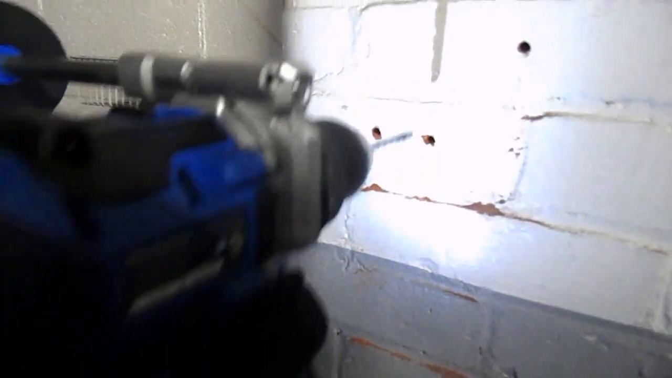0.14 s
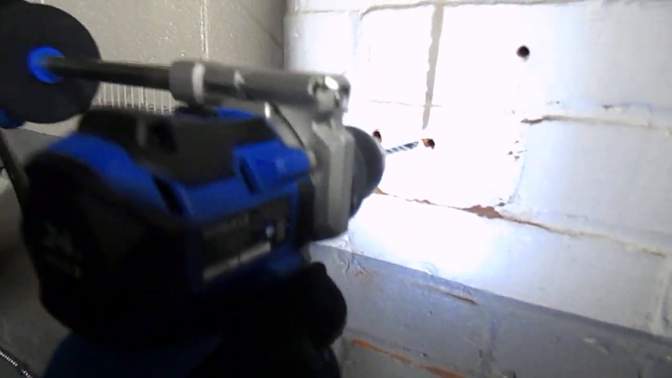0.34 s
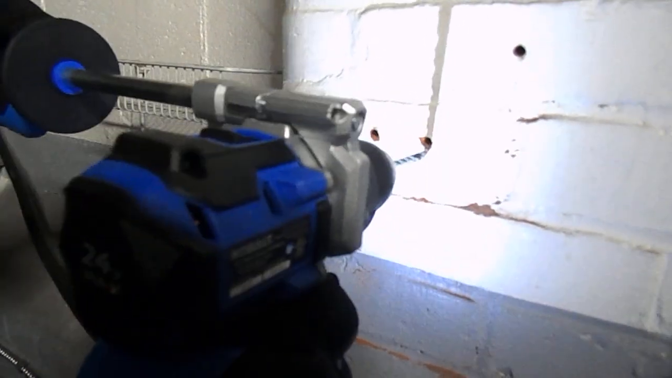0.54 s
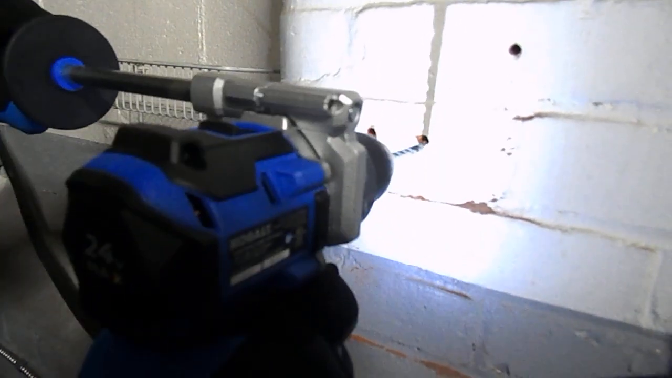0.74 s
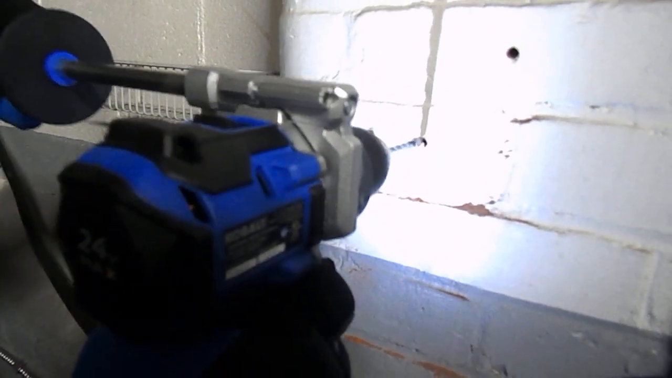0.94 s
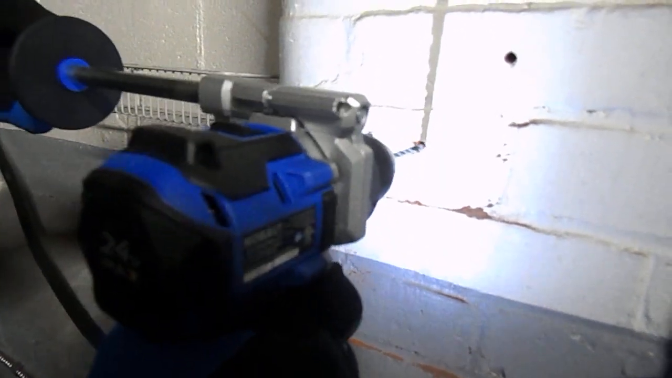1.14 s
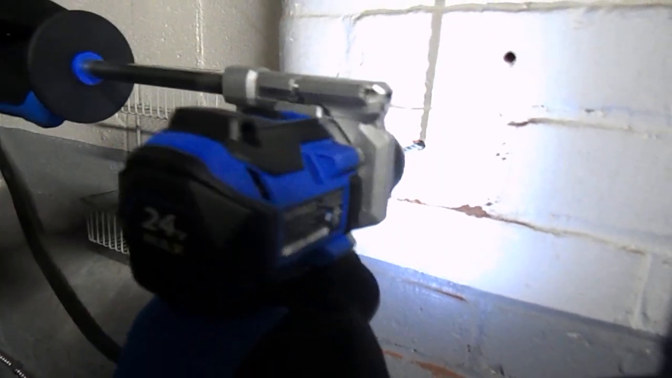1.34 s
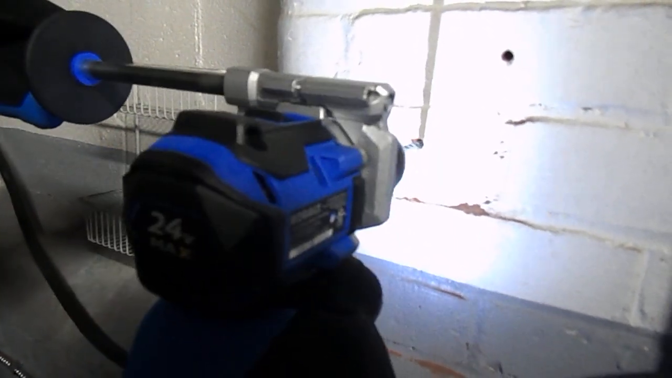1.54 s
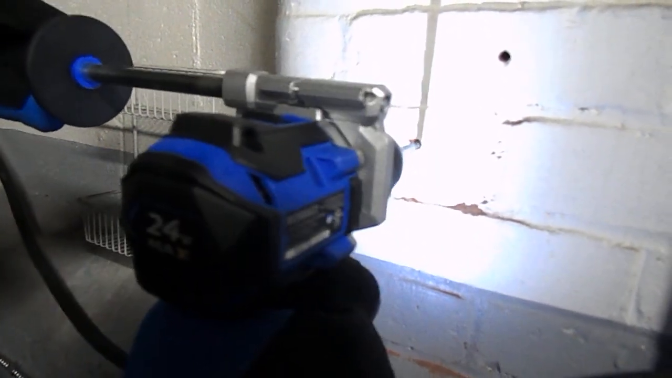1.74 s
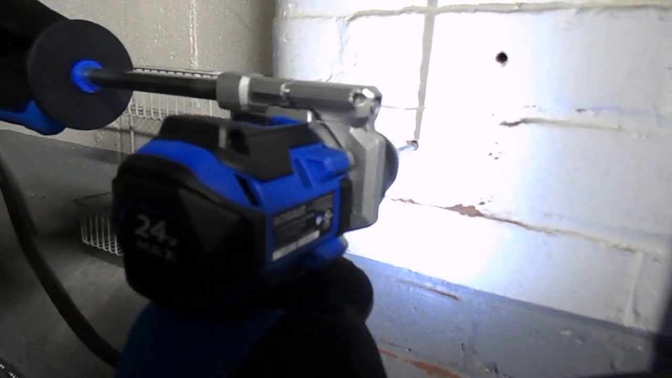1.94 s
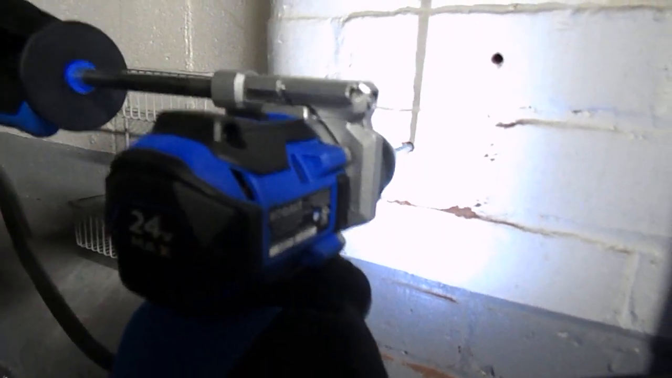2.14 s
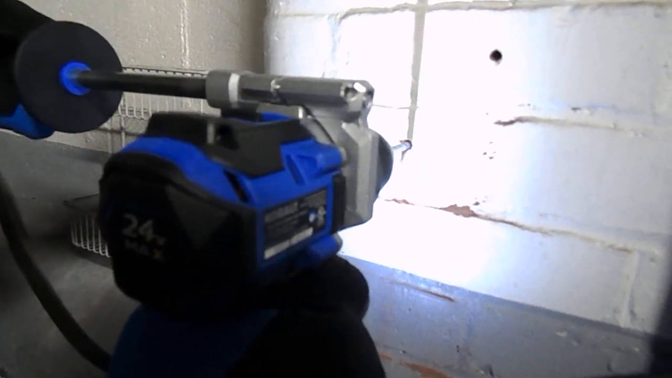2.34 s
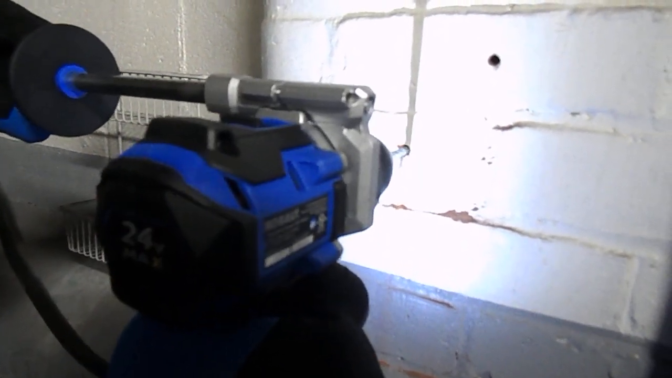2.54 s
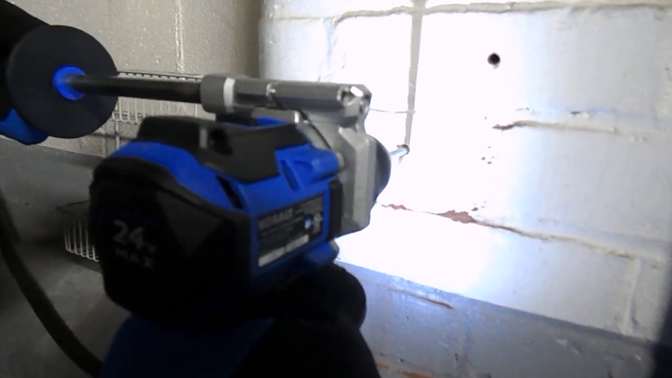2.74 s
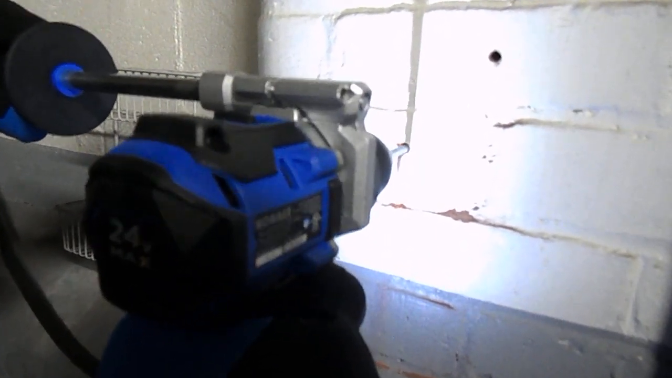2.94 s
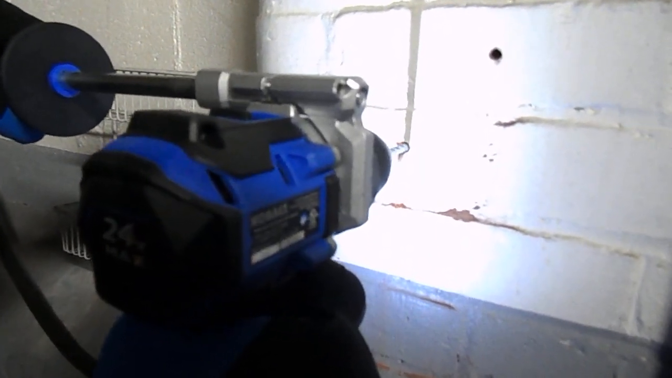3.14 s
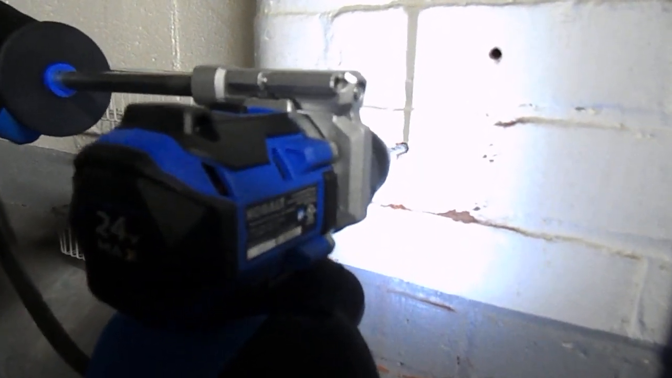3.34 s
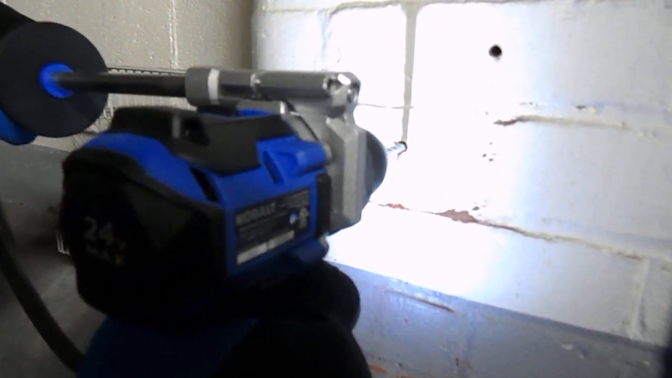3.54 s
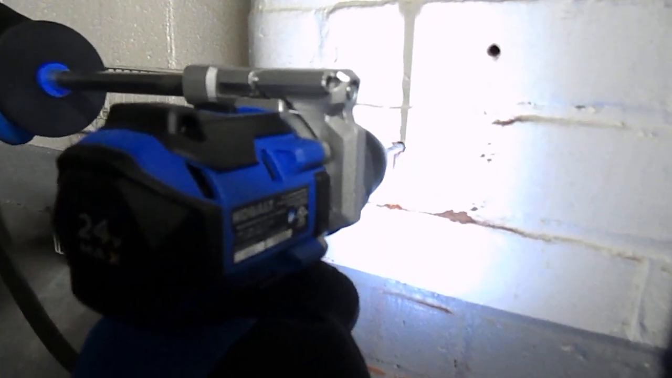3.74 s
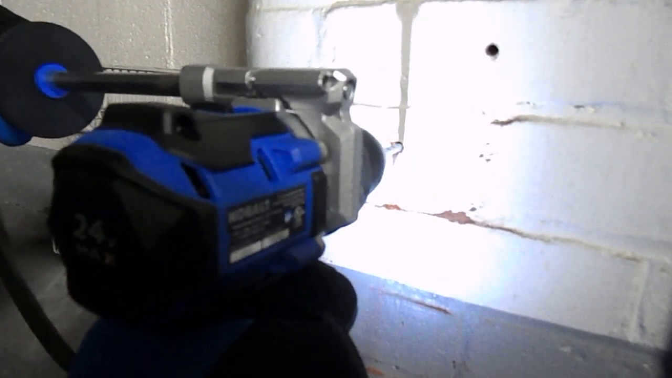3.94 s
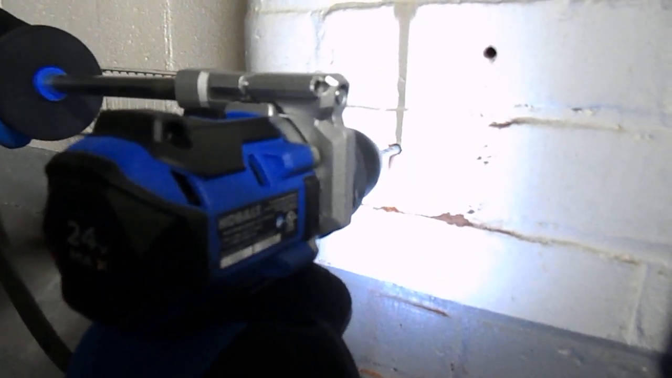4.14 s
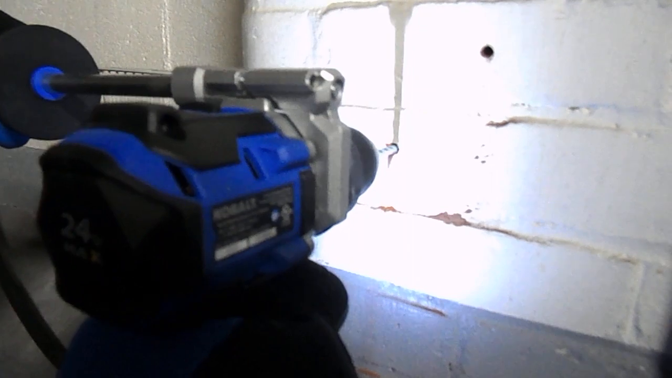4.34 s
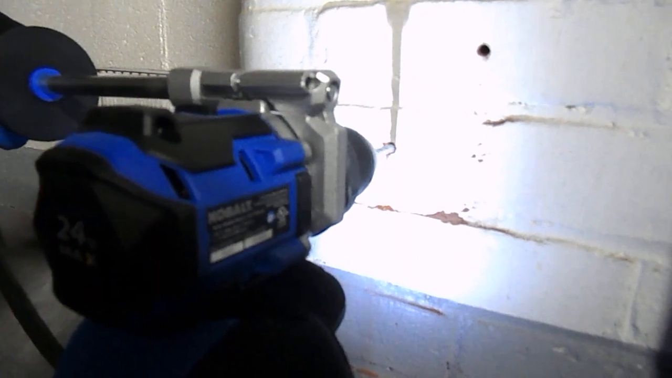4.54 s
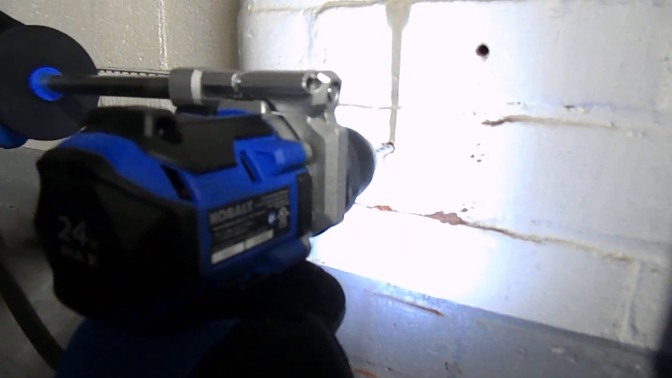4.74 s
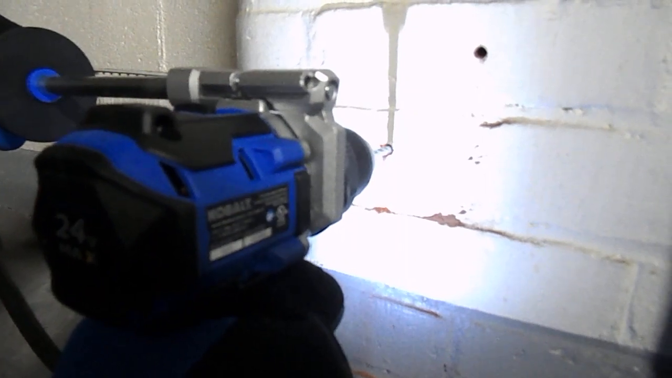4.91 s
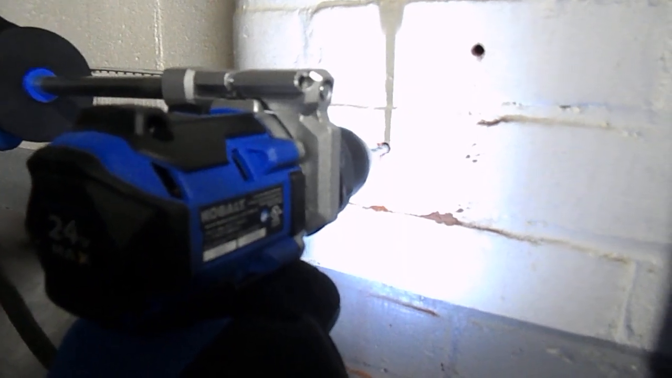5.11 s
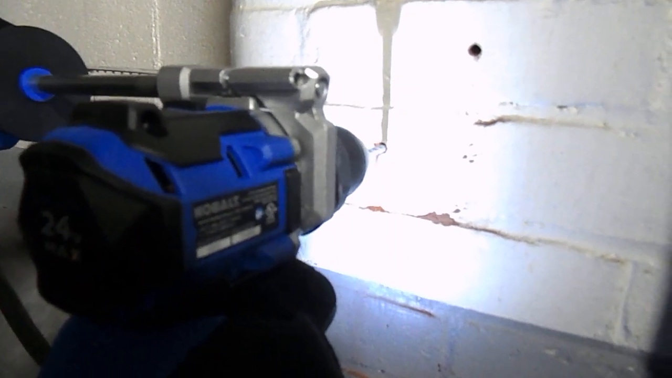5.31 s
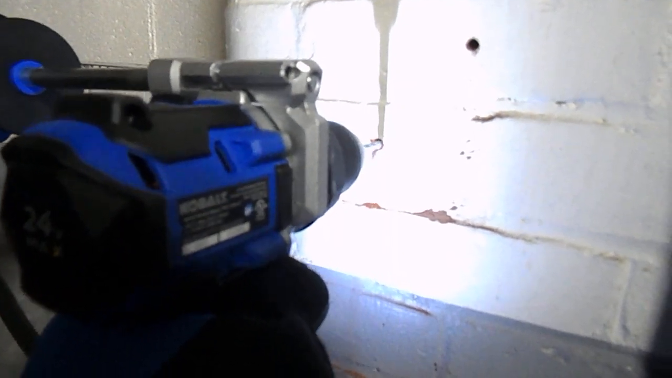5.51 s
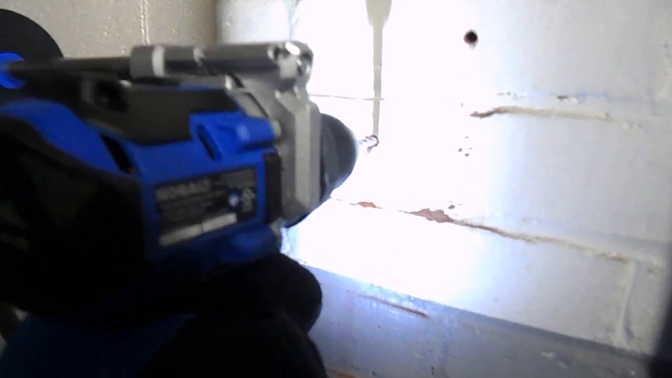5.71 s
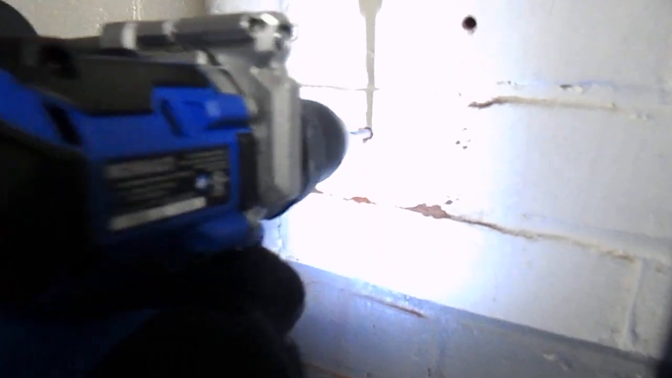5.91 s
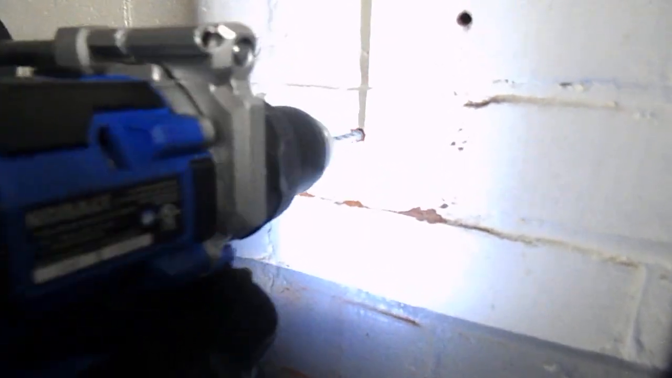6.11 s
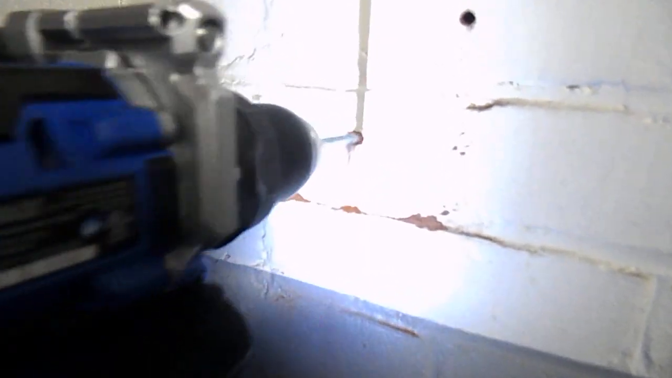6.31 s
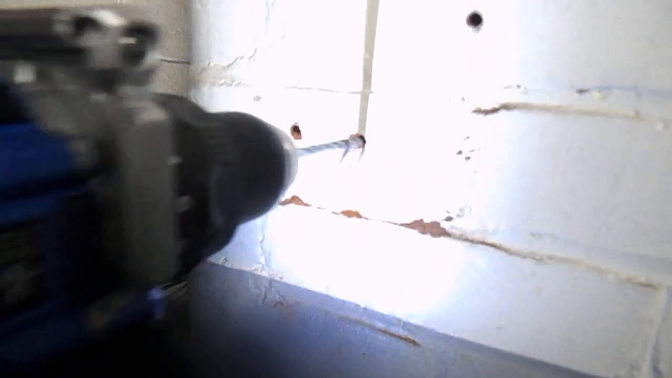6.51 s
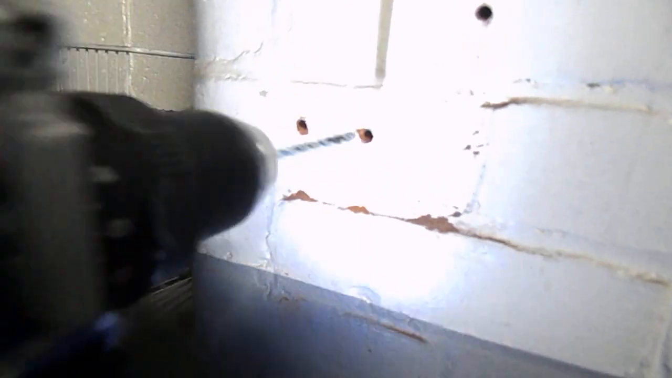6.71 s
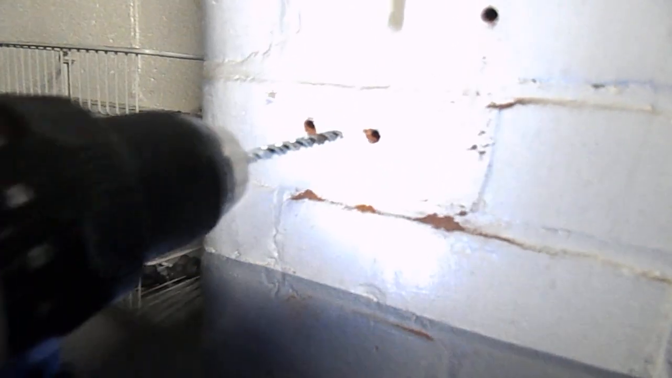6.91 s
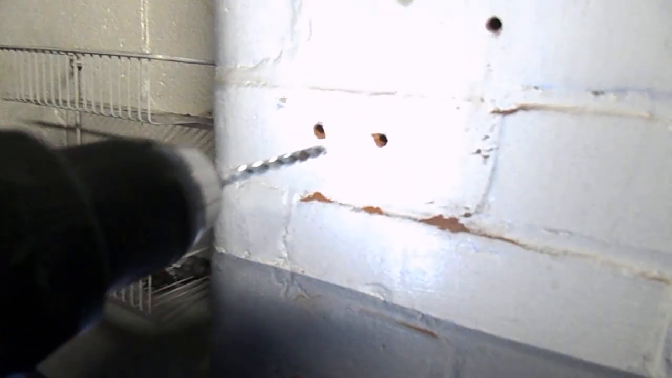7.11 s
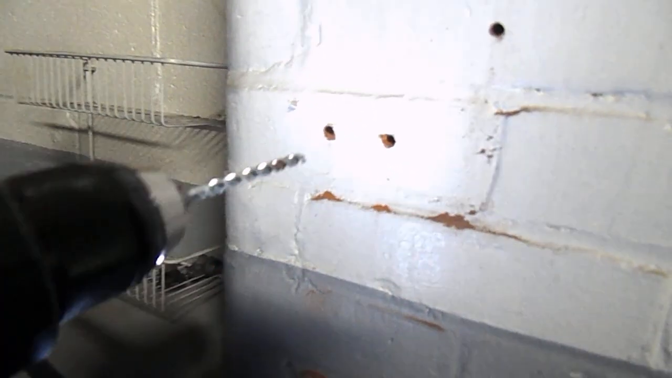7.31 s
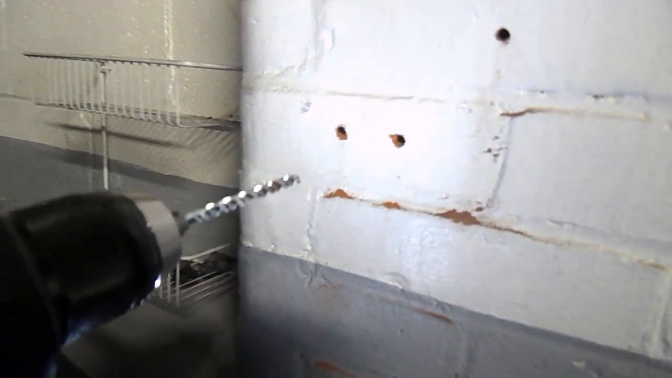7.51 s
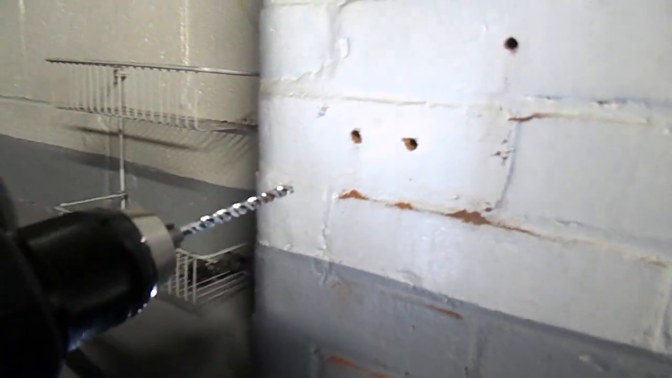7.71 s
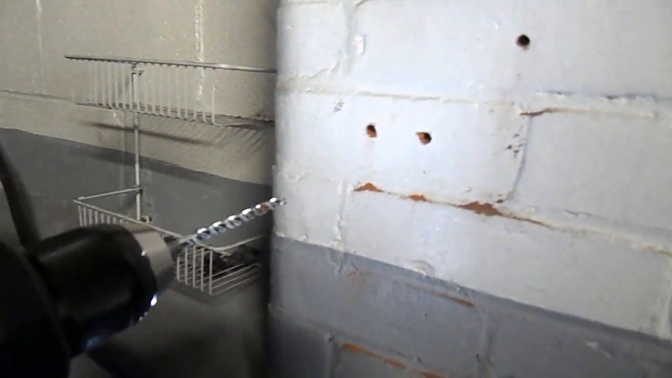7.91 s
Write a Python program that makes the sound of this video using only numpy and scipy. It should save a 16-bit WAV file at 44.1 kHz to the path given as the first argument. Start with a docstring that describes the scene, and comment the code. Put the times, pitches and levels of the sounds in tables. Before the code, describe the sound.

In a small hard-walled room, the tail of an earlier drill burst fades into quiet murmur. Small knocks and ticks set the bit on brick. The hammer drill then leaps to full speed, a steady piercing whine over dense rattle and gritty hiss, with brief squeaks. It dips once, recovers, grows airier as it is pulled back close to the microphone, then brakes sharply into quiet.

```python
"""A cordless hammer drill bores into a brick wall in a small room, an arm's length from a two-port camera microphone.
First an earlier burst dies away in the room; then the bit is set on the brick with knocks, ticks and a faint slide.
The motor jumps to full speed: pole pulses whine near a ring of the rotor, gears and ratchet rattle the housing,
the bit chatters and squeaks in the hole, and crushed grit and fan air hiss.
The speed sags once, the motor runs on as the bit is drawn back past the microphone, and the shaft brakes to a stop."""
import sys
import numpy as np
from scipy import signal
from scipy.fft import rfft, irfft
from scipy.io import wavfile
from scipy.ndimage import uniform_filter1d, map_coordinates

SR = 44100
rng = np.random.default_rng(int(sys.argv[2]) if len(sys.argv) > 2 else 0)


def digitize_waveform(pressure):
    """Quantize a signal to 16-bit integers and store it at the path in sys.argv[1].

    Rows of a 2-D input are taken as channels; values are limited to [-1, 1].
    """
    field = np.atleast_2d(pressure).T
    bounded = np.clip(field, -1, 1)
    quanta = np.round(bounded * 32767).astype(np.int16)
    wavfile.write(sys.argv[1], SR, quanta)


N = 351036
T = np.arange(N) / SR
FREQS = np.arange(N // 2 + 1) * SR / N


def undb(db):
    """Decibels to gain."""
    return 10 ** (np.asarray(db) / 20)


def unit(x):
    """Scale to rms 1."""
    return x / np.sqrt(np.mean(x ** 2))


def ramp(start_s, length_s):
    """A straight rise from 0 to 1."""
    return np.clip((T - start_s) / length_s, 0, 1)


def curves(rows):
    """Each column of a table joined by straight lines in time."""
    s, *columns = np.transpose(rows)
    return [np.interp(T, s, c) for c in columns]


def over_frequency(points):
    """Points joined on a log-frequency axis."""
    hz, value = np.transpose(points)
    return np.interp(np.log(FREQS + 1), np.log(hz), value)


def colour(x, points):
    """Give a sound the spectrum of (Hz, dB) points."""
    return irfft(rfft(x) * undb(over_frequency(points)), N)


def ring(x, hz, width_hz):
    """One resonance, gain 1 at its centre."""
    b, a = signal.iirpeak(hz, hz / width_hz, fs=SR)
    return signal.lfilter(b, a, x)


def walk(rate):
    """Random levels held 1 / rate s and smoothed twice; rms 1."""
    hold = int(SR / rate)
    steps = np.repeat(rng.standard_normal(N // hold + 1), hold)
    smooth = uniform_filter1d(uniform_filter1d(steps, hold), hold)
    return unit(smooth[:N])


def impacts(per_second, scatter_db):
    """Irregular blows of scattered size and random sign."""
    struck = rng.random(N) < per_second / SR
    sign = rng.choice([-1, 1], N)
    return struck * sign * undb(scatter_db * rng.standard_normal(N))


def strokes(rows, t60):
    """Envelopes that rise within a millisecond and die away, one for each (s, dB) row."""
    total = 0
    for s, db in rows:
        rise = np.clip((T - s) / 0.0005, 0, 1)
        total = total + rise * undb(db - 60 * np.clip(T - s, 0, 5 * t60) / t60)
    return total


# How alike the two ports of the microphone hear the sound.
# Each row: frequency in Hz, likeness from 0 to 1.
PORT_LIKENESS = [(100, 0.68), (1000, 0.99), (1900, 1), (2600, 0.66), (4000, 0.38), (6000, 0.3),
                 (8300, 0.27), (10000, 0.02), (15000, 0.2)]
PORT_LAG_MS = 0.041


def ports(direct, scattered):
    """Two ports: sound reaches the left one first, and scattered sound sets them apart in the treble."""
    likeness = np.clip(over_frequency(PORT_LIKENESS), 0, 1)
    mid = rfft(direct) * np.sqrt((1 + likeness) / 2)
    side = rfft(scattered) * np.sqrt((1 - likeness) / 2)
    delay = np.exp(-2j * np.pi * FREQS * PORT_LAG_MS / 1000)
    return irfft(np.array([mid + side, (mid - side) * delay]), N)


def stereo_noise(points):
    """Coloured noise at both ports, rms 1."""
    direct, scattered = colour(rng.standard_normal((2, N)), points)
    return unit(ports(direct, scattered))


def tone(hz, db, pan_db, lag_ms=PORT_LAG_MS):
    """A gliding sine at both ports, later at the right one; pan is left minus right."""
    phase = 2 * np.pi * np.cumsum(hz) / SR + rng.uniform(0, 2 * np.pi)
    late = 2 * np.pi * hz * lag_ms / 1000
    left = undb(db + pan_db / 2) * np.sin(phase)
    right = undb(db - pan_db / 2) * np.sin(phase - late)
    return np.sqrt(2) * np.array([left, right])


# The drill is drawn back past the microphone: its noises turn more direct, and later at the right port.
DRAW_BACK_AT_S, DRAW_BACK_S = 5.75, 1.1
NEAR_SCATTER_DB, NEAR_LAG_MS = -3.5, 0.059


def drawn_back():
    """0 while the drill is at the wall, 1 when it is beside the microphone."""
    return ramp(DRAW_BACK_AT_S, DRAW_BACK_S)


def moving_ports(direct, scattered):
    """Noise of the drill at both ports, rms 1: more direct and further left as it is drawn back."""
    near = drawn_back()
    left, right = ports(direct, scattered * undb(NEAR_SCATTER_DB * near))
    heard_at = (T - near * NEAR_LAG_MS / 1000) * SR  # in samples
    right = map_coordinates(right, [heard_at], mode="nearest")
    return unit(np.array([left, right]))


# Colour of the air in the room, with no sound of the drill.
# Each row: frequency in Hz, relative level in dB.
ROOM_AIR = [(50, -45), (100, -20.5), (180, -8), (280, -2), (520, -3), (690, -1), (850, -4.5), (1400, -6.5),
            (2400, -11.5), (4500, -14), (6000, -10), (8000, -13), (12000, -18), (15500, -23.5)]
# Murmur before and after the drilling, and hiss, as rms in dB.
MURMUR_BEFORE_DB, MURMUR_AFTER_DB, HISS_DB = -42.5, -48.5, -51
# From the braking on, everything here is this much fainter, until it swells back.
LULL_DB, LULL_UNTIL_S, SWELL_S = -3.5, 7.1, 0.21
BRAKE_AT_S = 6.866


def background():
    """Room murmur and hiss, split at 4 kHz, with a thin electrical whistle."""
    after = T > BRAKE_AT_S
    lull_db = LULL_DB * after * (1 - ramp(LULL_UNTIL_S, SWELL_S))
    murmur_db = np.where(after, MURMUR_AFTER_DB, MURMUR_BEFORE_DB)
    air = stereo_noise(ROOM_AIR)
    low, high = (unit(signal.sosfilt(signal.butter(4, 4000, kind, fs=SR, output="sos"), air))
                 for kind in ("low", "high"))
    whistle = tone(np.full(N, 11719), -68.5, 0, lag_ms=.01)
    murmur = low * undb(murmur_db + 0.32 * walk(15))
    return (murmur + high * undb(HISS_DB) + whistle) * undb(lull_db)


ROOM_T60_S = .42


def room(x, wet_db):
    """The near wall throws back a quick bright spray of echoes; the rest of the room rings longer and duller."""
    t = T[:SR // 2]
    near, far = rng.standard_normal((2, 2, len(t))) * (t > .005)
    far = signal.lfilter(*signal.butter(1, 4500, fs=SR), far)
    far = far * undb(-60 * t / ROOM_T60_S)
    response = far + 0.75 * near * undb(-60 * t / .13)
    response = response / np.sqrt(np.sum(response[0] ** 2))
    return undb(wet_db) * signal.fftconvolve(x, response, axes=1)[:, :N]


def dying_burst():
    """The room still rings with the rattle and rotor note of the burst before."""
    tail = stereo_noise([(200, -20), (700, -9), (1450, -1.5), (2500, -11.5), (3150, -9), (3420, 2), (3750, -9),
                         (8000, -18), (15000, -28)])
    return tail * strokes([(0, -27.0)], t60=ROOM_T60_S)


# Dull knocks before the start, in the spin-up and at the braking. Each row: start in seconds, level in dB.
HOUSING_KNOCKS = [(.624, -34), (.809, -33), (1.383, -38), (1.587, -22), (6.932, -18.5)]
# Small sharp ticks of bit and trigger. Each row: start in seconds, level in dB.
BIT_TICKS = [(.768, -39), (.803, -30), (1.054, -31), (1.061, -36), (1.113, -31), (1.521, -31), (1.527, -35)]
# The steel tip slides over the paint: middle, half length, level.
SLIDE_AT_S, SLIDE_S, SLIDE_DB = 1.27, .13, -55.5


def handling():
    """Short decaying noises make dull knocks of the housing and bright ticks; a soft swell of treble is the slide."""
    knocks = stereo_noise([(100, -31), (280, -8), (700, -1), (1050, 7), (1700, -9), (4000, -22.5), (12000, -45)])
    ticks = stereo_noise([(500, -13), (2000, -1.0), (4000, -1.5), (8000, -5.5), (12500, -1.5), (15500, -7)])
    slide = stereo_noise([(6000, -33.5), (10500, -14), (12200, 2), (14000, -13.5)])
    slide_swell = np.exp(-((T - SLIDE_AT_S) / SLIDE_S) ** 2)
    slide = slide * slide_swell * undb(SLIDE_DB + 3 * walk(50))
    return knocks * strokes(HOUSING_KNOCKS, t60=0.054) + ticks * strokes(BIT_TICKS, t60=0.017) + slide


# The flutes squeak in the hole.
# Each row: middle in seconds, peak level in dB, pitch in Hz, glide in Hz per second.
FLUTE_SQUEAKS = [(3.168, -16, 5150, -1.5), (4.313, -18, 5000, 5), (4.872, -16.5, 5150, -8000),
                 (5.762, -20, 5150, 1), (5.874, -12.5, 5430, -30000)]


def squeaks():
    """Brief gliding squeals, a little unsteady in pitch, where steel rubs the side of the hole."""
    out = 0
    for s, db, hz, glide in FLUTE_SQUEAKS:
        since = np.clip(T - s, -.05, .05)
        swell = np.exp(-(since / .008) ** 2)
        out = out + swell * tone(hz + glide * since + 60 * walk(300), db, 0)
    return out


# The trigger under the finger. Each row: pulled in seconds, let go in seconds.
TRIGGER_PULLS = [(1.557, 6.115), (6.265, 6.783)]
# Full speed of the motor shaft in turns per second, and the share by which the governor lets it wander (rms).
CRUISE_HZ, GOVERNOR_SLACK = 492, .0004
# Under power the speed climbs an S-shaped curve: its time scale and steepness.
SPIN_UP_S, SPIN_UP_POWER = .061, 1.7
# Let go, the shaft loses this much speed in this time, fastest at first.
COAST_LOSS_HZ, COAST_S, COAST_POWER = 90, .15, .65
# From BRAKE_AT_S the brake bites ever harder until the shaft stands.
BRAKE_S, BRAKE_POWER = .089, 1.3


def shaft_speed():
    """Turns per second: each pull spins up from the speed still left; let go, it coasts; at last it is braked."""
    hz = np.zeros(N)
    for pulled, let_go in TRIGGER_PULLS:
        speed_left = hz[int(pulled * SR)] / CRUISE_HZ
        head_start = (-np.log(1 - speed_left)) ** (1 / SPIN_UP_POWER)
        climb = head_start + np.maximum(T - pulled, 0) / SPIN_UP_S
        powered = CRUISE_HZ * (1 - np.exp(-climb ** SPIN_UP_POWER))
        loss = COAST_LOSS_HZ * (np.maximum(T - let_go, 0) / COAST_S) ** COAST_POWER
        hz = np.where(T < pulled, hz, powered - loss)
    braking = 1 - ramp(BRAKE_AT_S, BRAKE_S) ** BRAKE_POWER
    return np.maximum(hz, 0) * braking * (1 + GOVERNOR_SLACK * walk(45))


def coast(hz):
    """Loose parts and moving air go on for a moment after the shaft has braked."""
    keep = np.exp(-1 / (0.0098 * SR))  # decay time 9.8 ms
    return np.maximum(hz, signal.lfilter([1 - keep], [1, -keep], hz + 1e-18))


def slowing(hz):
    """Speed of the loose parts in powers of ten: 0 at full speed, negative below."""
    return np.log10(coast(hz) / CRUISE_HZ + 1e-9)


# Rush of the fan air. Each row: frequency in Hz, relative level in dB.
FAN_AIR = [(100, -25), (200, -10.5), (310, 0.5), (550, -3.5), (2000, -17), (3200, 1), (6500, -8), (8100, 7),
           (9300, -0.5), (10500, 0), (12200, 3.5), (15500, 0)]
# Level at full speed at the wall, fall in dB per tenfold speed, and gain as the vents turn to the microphone.
FAN_DB, FAN_SPEED_DB, VENTS_DB = -21.5, 86, 8
VENTS_TURN_AT_S, VENTS_TURN_S = 5.7, 0.75


def fan(hz):
    """Turbulent air from the motor's fan, a little stronger on the left."""
    air_db = FAN_DB + FAN_SPEED_DB * slowing(hz) + VENTS_DB * ramp(VENTS_TURN_AT_S, VENTS_TURN_S)
    air = moving_ports(*colour(rng.standard_normal((2, N)), FAN_AIR))
    side_db = np.array([[.7], [-.7]])
    return air * undb(air_db + 0.78 * walk(80) + side_db)


# Surges of torque on starting and braking.
# Each row: peak in seconds, rotor kicks in dB, gear scrape in dB, rise in dB per second, fall in dB per second.
TORQUE_SURGES = [(1.612, -1, -26.5, 257, 2200), (6.939, -24, -22, 520, 599)]


def surges():
    """Strength of the rotor kicks and of the gear scrape: each surge builds to its peak and collapses."""
    total = 0
    for s, kick_db, scrape_db, rise, fall in TORQUE_SURGES:
        below_peak_db = np.maximum(rise * (s - T), fall * (T - s))
        total = total + undb(np.array([[kick_db], [scrape_db]]) - below_peak_db)
    return total


# Ring of the housing. Each row: frequency in Hz, relative level in dB.
HOUSING_RING = [(60, -50), (180, -36), (300, -14), (390, -11.5), (550, -12.5), (660, -1), (900, 2),
                (1200, 6.5), (1620, 3), (1950, 4), (2250, -4.5), (2600, -12.5), (4000, -19), (9000, -40)]
# Modes of the bit pressed into the hole. Each row: frequency in Hz, width in Hz, relative level in dB.
BIT_MODES = [(1354, 76, 4), (1430, 110, 4)]
# Hiss of crushed grit. Each row: frequency in Hz, relative level in dB.
GRIT_HISS = [(800, -43), (2200, -2), (2800, 0.5), (3400, 2.5), (4300, -1), (6100, -3.5), (6600, 1),
             (7050, -0.5), (7600, -1.5), (8350, 0), (9000, -5.5), (10300, -8), (11500, -6), (13000, -10),
             (15500, -11.5)]
# How hard the bit is pushed into the brick. Each row: time in seconds, feed in dB.
FEED_PUSH = [(1.66, -7.5), (1.9, 2), (2.06, 1), (2.6, -0.3), (3.1, 0), (4.8, -0.35), (5.4, 0.2), (6.1, 0.4),
             (6.22, -2), (6.8, -1.5)]
# The noises of the work. Each holds: level in dB, dB per dB of feed, dB per tenfold speed.
RATTLE_LEVEL = (-14, 0.63, 59)
CHATTER_LEVEL = (-17, 1.7, 60)
GRIT_LEVEL = (-14, 0.62, 39)
GRIT_FADE_DB_PER_S = .5  # the deepening hole muffles the grit
NEAR_RATTLE_DB = 1.5  # the gears get louder as the drill is drawn back


def boring(hz):
    """Random blows rattle the housing, chatter the bit in its modes and hiss as grit; all follow feed and speed."""
    feed_db, = curves(FEED_PUSH)
    slow = slowing(hz)
    rattle_db, chatter_db, grit_db = (db + by_feed * feed_db + by_speed * slow
                                      for db, by_feed, by_speed in (RATTLE_LEVEL, CHATTER_LEVEL, GRIT_LEVEL))
    rattle_db = rattle_db + NEAR_RATTLE_DB * drawn_back()
    grit_db = grit_db - GRIT_FADE_DB_PER_S * (T - TRIGGER_PULLS[0][0])
    scrape = surges()[1]
    turning = np.clip(coast(hz) / CRUISE_HZ / 0.25, 0, 1)  # blows thin out below a quarter of full speed
    bite_db = 0.35 * walk(30)  # the tip catches and slips
    grab_db = 2.2 * walk(70)  # the bit flares briefly at each grab

    # each noise is drawn twice: direct, then scattered
    rattle = moving_ports(*(colour(impacts(5000 * turning, scatter_db=1.0), HOUSING_RING) for _ in range(2)))
    blows = [impacts(2200 * turning, scatter_db=1.0) for _ in range(2)]
    chatter = moving_ports(*(sum(undb(db) * ring(b, f, width) for f, width, db in BIT_MODES) for b in blows))
    grit = moving_ports(*(colour(impacts(14000 * turning, scatter_db=2), GRIT_HISS) for _ in range(2)))

    rattle = rattle * (undb(rattle_db + bite_db + 0.51 * walk(60)) + scrape * undb(-10))
    chatter = chatter * undb(chatter_db + bite_db + grab_db)
    grit = grit * (undb(grit_db + .5 * bite_db + 0.85 * walk(70)) + scrape)
    return rattle + chatter + grit


ROTOR_HZ, ROTOR_WIDTH_HZ = 3375, 280
# The rotor rings in a close pair of modes. Each row: frequency in Hz, width in Hz, relative level in dB.
ROTOR_PAIR = [(3210, 180, 2), (3430, 190, 2.5)]
# The rotor jerks. Each row: start in seconds, relative level in dB.
ROTOR_JOLTS = [(.001, -12), (.015, -14), (1.557, 6.5)]


def rotor_kicks(hz):
    """Heavy current kicks the rotor four times a turn; its ring flares as multiples of the kicks sweep through."""
    current = surges()[0]
    kicks = np.diff(np.floor(4 * np.cumsum(hz) / SR), prepend=0)
    kicks = kicks * current * undb(1.5 * walk(500))
    # neighbouring modes swing against each other, so the ring is broad on top and steep at its sides
    flare = 0
    for k, (f, width, db) in enumerate(ROTOR_PAIR):
        flare = flare + 17 * (-1) ** k * undb(db) * ring(kicks, f, width)
    jolt_phase = 2 * np.pi * np.cumsum(ROTOR_HZ + 90 * walk(700)) / SR
    jolts = strokes(ROTOR_JOLTS, t60=0.02) * np.sin(jolt_phase)
    # the speed controller's switching sings, split in two by the turning poles
    switching = sum(np.sin(2 * np.pi * np.cumsum(10050 + sign * 4 * hz) / SR) for sign in (-1, 1))
    switching = switching * current * undb(-25.5) * np.clip(hz / 150, 0, 1)
    out = flare + jolts + switching
    return np.array([0.86 * out, 1.5 * np.roll(out, 1)])  # stronger, one sample later, at the right port


def rotor_db(hz):
    """How strongly the rotor answers a push at this frequency."""
    return -10 * np.log10(1 + (2 * (hz - ROTOR_HZ) / ROTOR_WIDTH_HZ) ** 2)


# Motor tones with the bit in the hole, then on the way out; motor() trims these levels.
# Each row: time in seconds, whine in dB, its left minus right in dB, its octave in dB, top whistle in dB.
IN_THE_HOLE = [(1.76, -20, -3.5, -34.5, -48), (1.93, -16.5, -3.5, -36, -33), (3.63, -16.5, -5.0, -25, -32),
               (4.64, -19, -9.5, -34, -37), (5.23, -19.5, -11, -37, -31), (5.74, -19, -7, -37, -36),
               (5.77, -21, -6, -37, -38), (6.03, -16, -4.0, -35, -26), (6.1, -19.5, -4.0, -37, -42)]
ON_THE_WAY_OUT = [(6.39, -18, -5, -36, -34), (6.678, -18.5, -1, -20, -35), (6.75, -19, 1, -28, -38)]
# Shaft and gear tones. Each row: multiple of the shaft rate, level in dB at full speed,
# left minus right in dB, flutter in dB (rms; its sign does not matter).
SHAFT_ORDERS = [(1, -31, 0, -1.5), (2, -37.5, -9.5, 4.5), (3, -31.5, 3, 5.5), (4, -24, -7, 2),
                (10, -41, 3, 5.5), (12, -40, 10, 4), (20, -44, -3, -2), (23, -30.5, 1, 3.5)]
NEAR_SWELL_LOSS = 0.22  # share of the whine's swell that is lost once the drill is drawn back


def motor(hz):
    """Tones locked to the shaft, fading as it slows; the eighth multiple swells as it nears the rotor's ring."""
    whine_db, pan_db, octave_db, whistle_db = curves(np.vstack([IN_THE_HOLE, ON_THE_WAY_OUT]))
    near = drawn_back()
    slow_db = 20 * np.log10(hz / CRUISE_HZ + 1e-6)
    # at full speed the whine lies above the rotor's ring, so a lower speed brings it onto the ring
    swell_db = (rotor_db(8 * hz) - rotor_db(8 * CRUISE_HZ)) * (1 - NEAR_SWELL_LOSS * near)
    whine_db = whine_db + 5.0 + swell_db + 3.4 * slow_db + 0.59 * walk(40)
    out = tone(8 * hz, whine_db, pan_db * undb(-swell_db), lag_ms=0.059)
    octave_db = octave_db + 5 * slow_db + 1.5 * walk(60)
    out += tone(16 * hz, octave_db, -1.1, lag_ms=0.088)
    whistle_db = whistle_db + 0.5 + 5 * near + 8 * slow_db + 2 * walk(60)
    out += tone(28 * hz, whistle_db, 3, lag_ms=.05 + .035 * near)
    for order, db, side_db, flutter_db in SHAFT_ORDERS:
        out += tone(np.round(order) * hz, db + 4 * slow_db + flutter_db * walk(55), side_db)
    return out


def scene():
    """The drill, its handling and the room."""
    hz = shaft_speed()
    drill = motor(hz) + rotor_kicks(hz) + boring(hz) + fan(hz) + squeaks() + handling()
    return drill + room(drill, wet_db=-19.0) + dying_burst() + background()


LOW_CUT_HZ, TOP_HZ = 340, 15700


def record(dry):
    """The recorder clips the highest peaks, thins the bass and cuts the top."""
    clipped = np.clip(dry, -1, 1)
    thin = signal.sosfilt(signal.butter(1, LOW_CUT_HZ, "high", fs=SR, output="sos"), clipped)
    return signal.sosfilt(signal.ellip(10, .1, 70, TOP_HZ, fs=SR, output="sos"), thin)


dry = scene()
out = record(dry)
digitize_waveform(out)
```